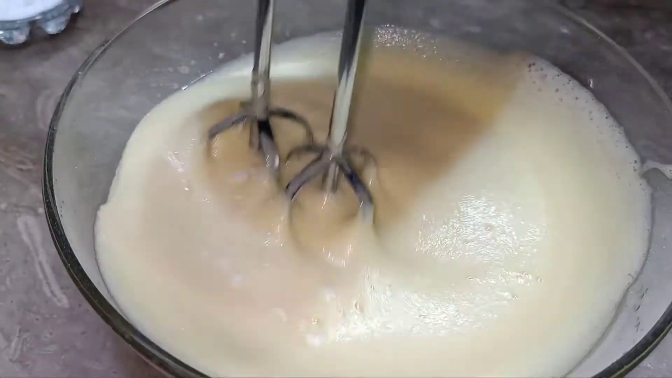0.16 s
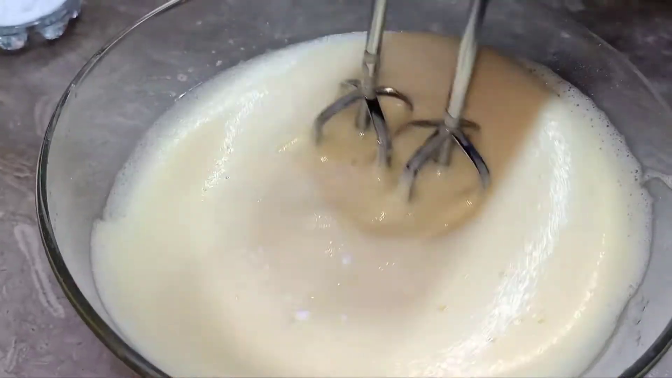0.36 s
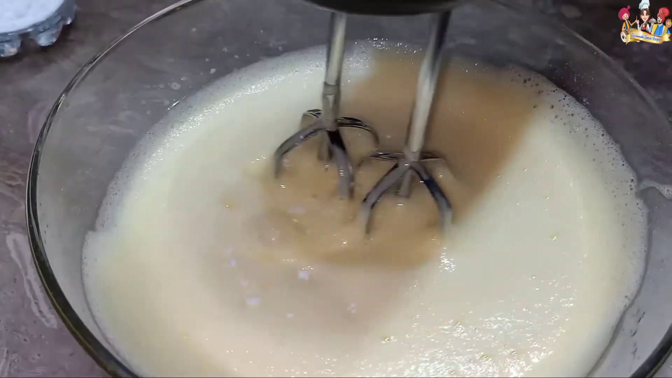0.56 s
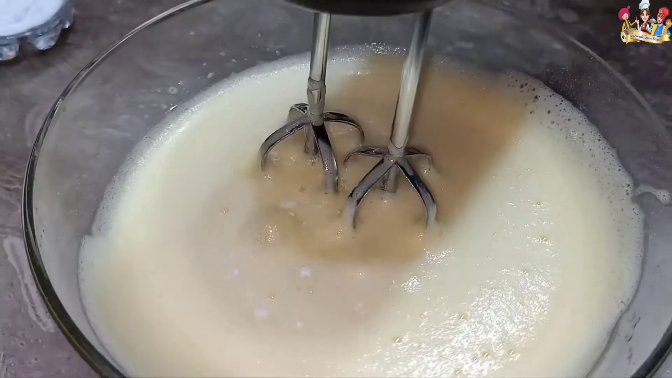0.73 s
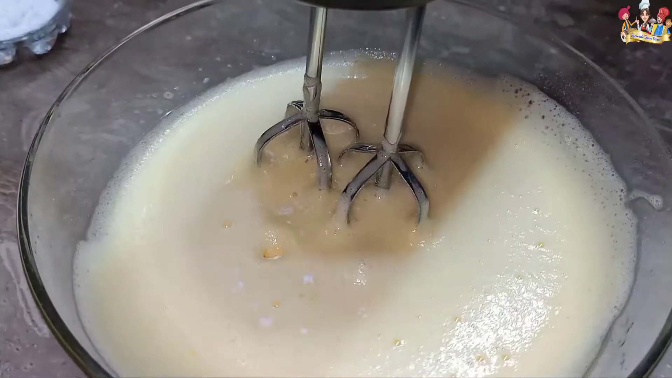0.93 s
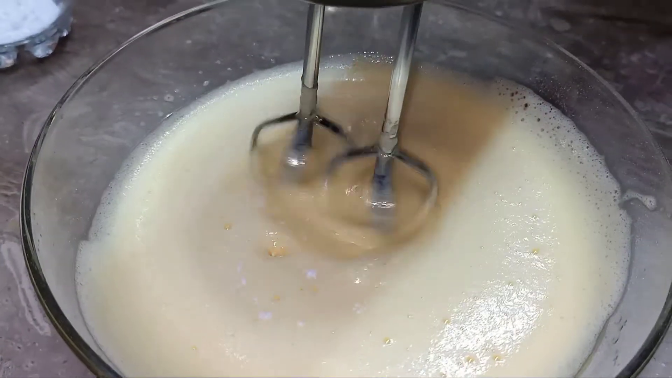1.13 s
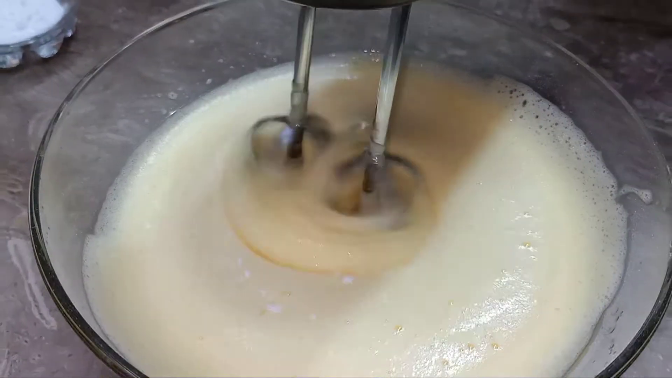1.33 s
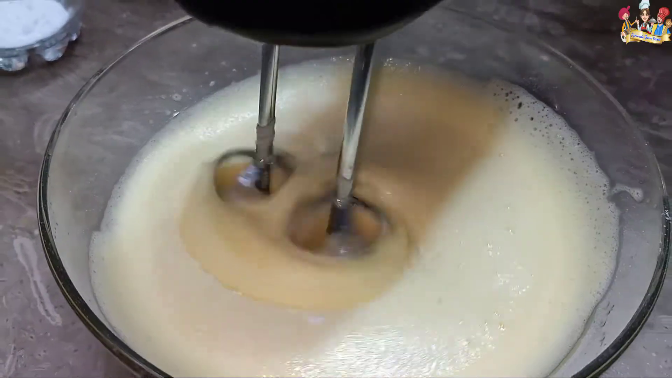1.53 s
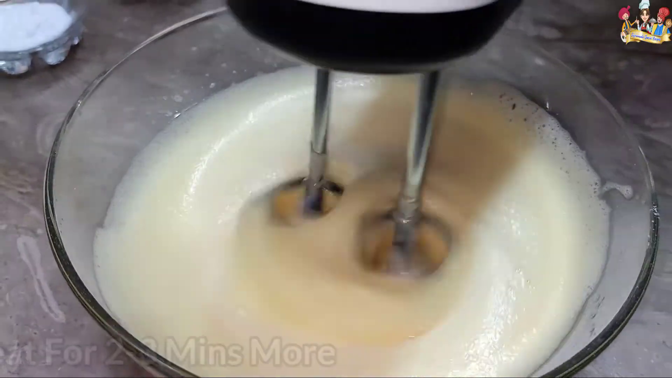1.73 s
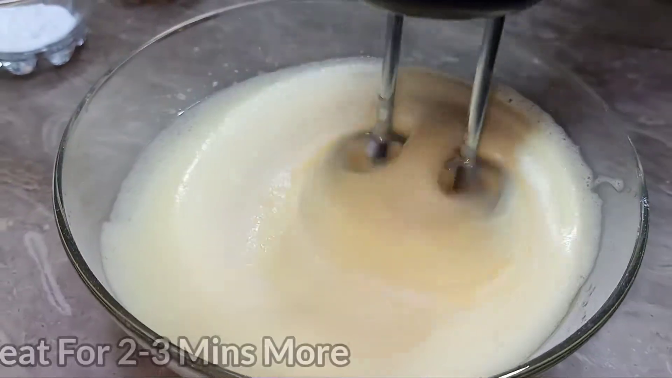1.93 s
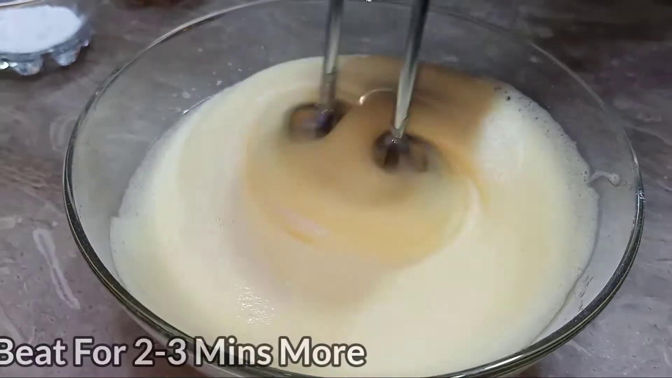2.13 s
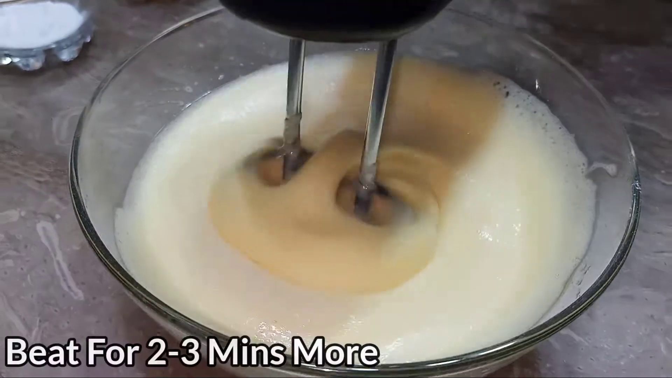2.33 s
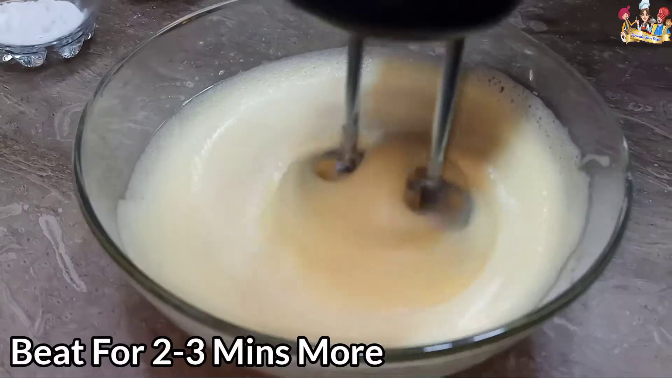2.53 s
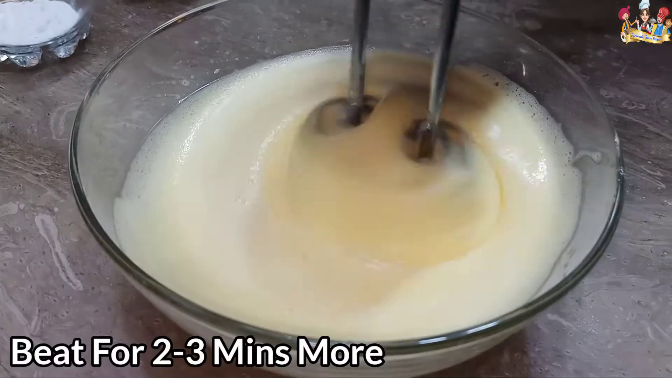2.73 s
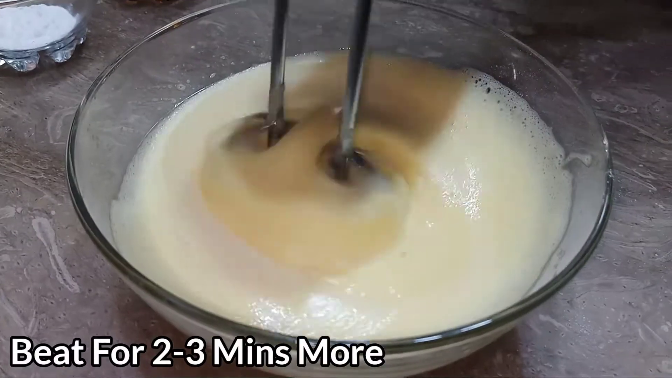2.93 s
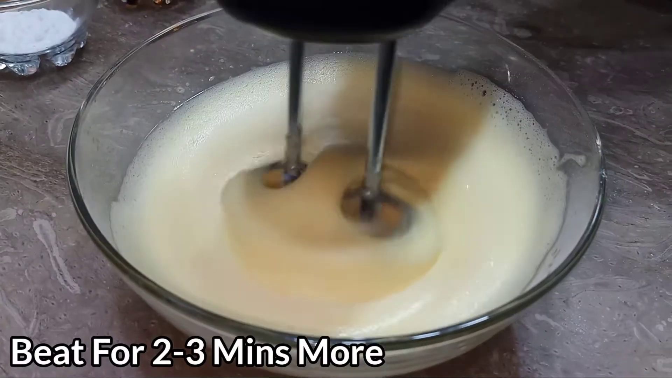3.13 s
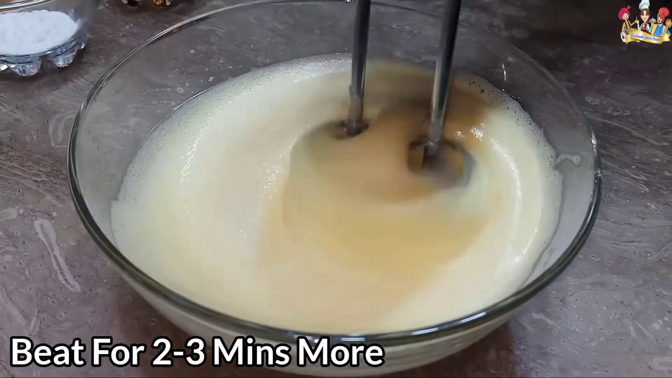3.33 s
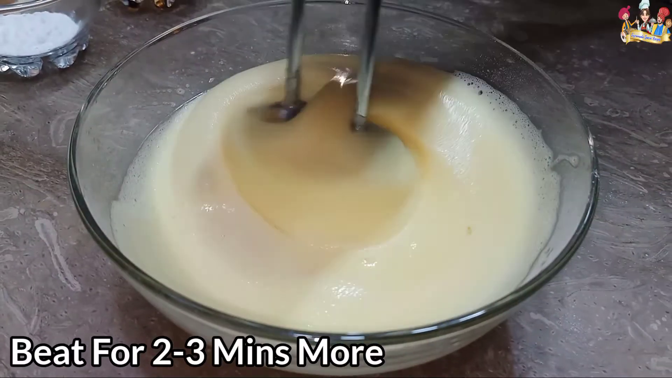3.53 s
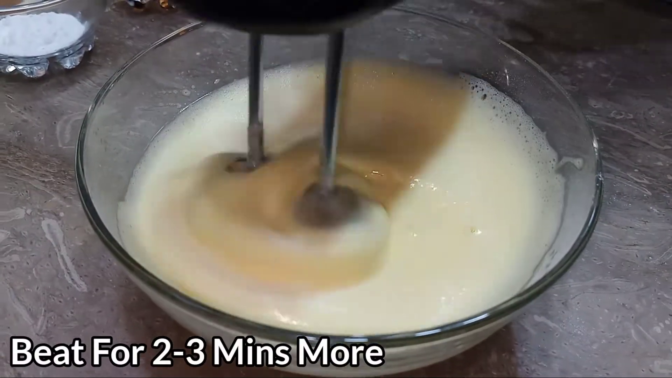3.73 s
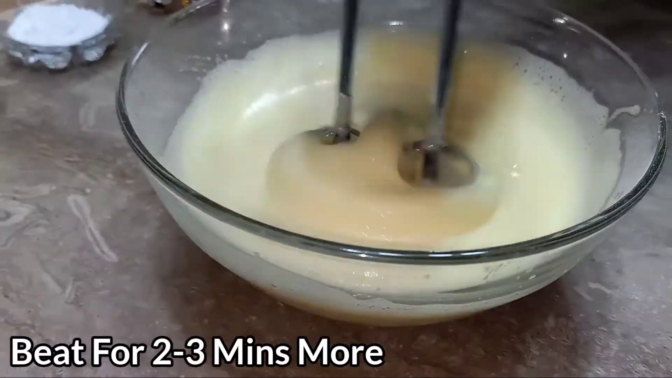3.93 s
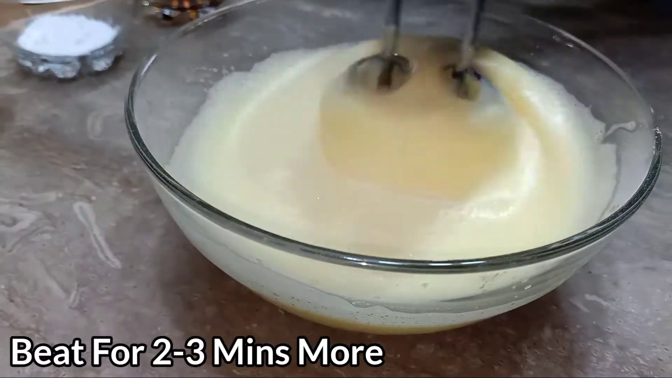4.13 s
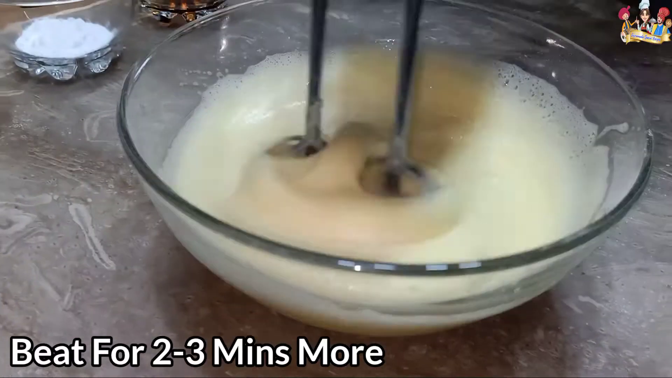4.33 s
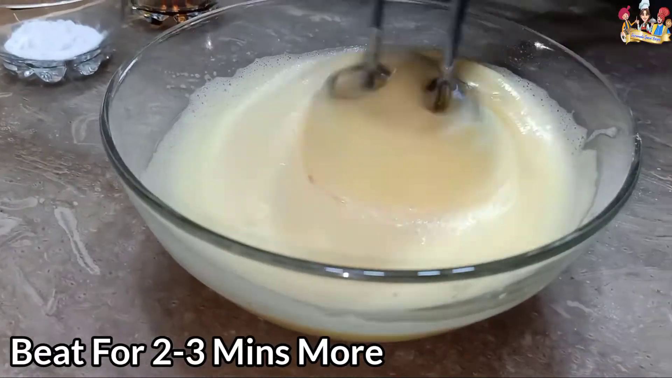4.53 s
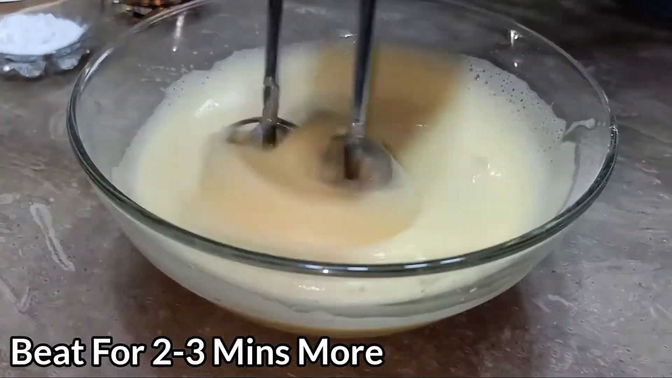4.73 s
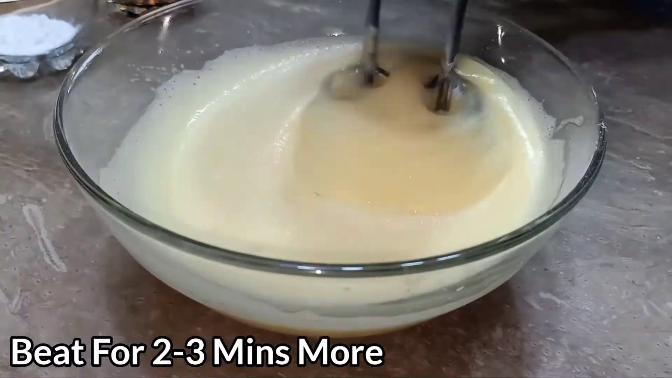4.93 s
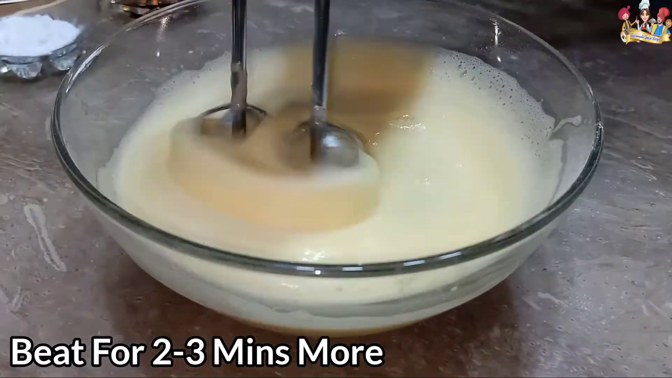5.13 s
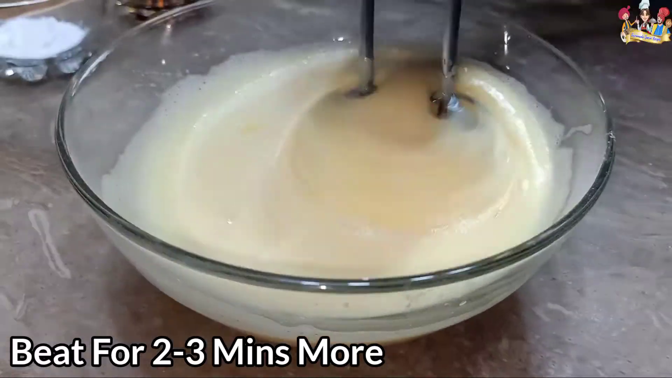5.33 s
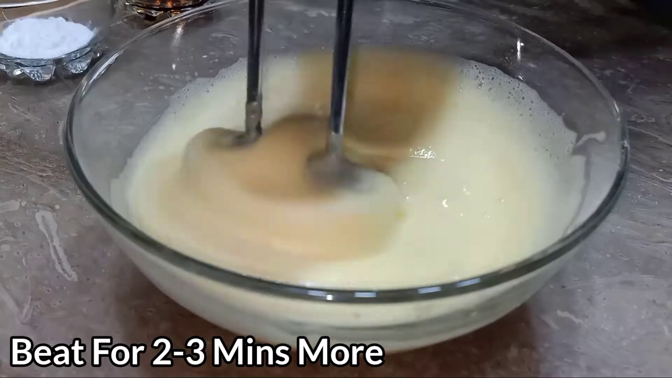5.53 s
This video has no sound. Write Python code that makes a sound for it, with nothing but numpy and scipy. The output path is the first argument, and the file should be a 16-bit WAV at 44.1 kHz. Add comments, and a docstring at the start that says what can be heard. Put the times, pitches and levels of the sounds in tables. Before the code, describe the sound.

After a second of small knocks and clicks, an electric mixer spins up, buzzes and rattles through batter, then cuts to faster, softer whirring.

```python
"""An electric hand mixer, its motor whining up to speed and rattling its housing, whips batter in a glass bowl.
Before it starts, the beaters knock on the bowl, the grip shifts and plastic clicks in a quiet small kitchen.
Taps of brushes and gears excite resonances, slots and bars give the whine, low multiples of the turn the hum.
Wires graze the glass as sines and tick as bright noise bursts; damped modes sound the knocked bowl.
Near the end the scene cuts to such mixing played half again as fast, so higher, and turned down."""
import sys
import numpy as np
from scipy import signal
from scipy.fft import rfft, irfft, next_fast_len
from scipy.io import wavfile
from scipy.ndimage import map_coordinates

SR = 44100
rng = np.random.default_rng(int(sys.argv[2]) if len(sys.argv) > 2 else 0)


def materialize(psi):
    """Save the field psi as 16-bit PCM at rate SR to the path in sys.argv[1].

    A 1-D psi becomes a single channel; in a 2-D psi each row is a channel.
    """
    bounded = np.clip(np.atleast_2d(psi).T, -1, 1)
    quanta = np.round(bounded * 32767).astype(np.int16)
    wavfile.write(sys.argv[1], SR, quanta)


N = 245637
TIME = np.arange(N) / SR
FULL_SPEED = 277   # reference speed, turns per s


def from_db(db):
    """Level as a logarithm: 20 dB is a tenfold amplitude."""
    return 10 ** (np.asarray(db) / 20)


def rms_one(x):
    """Normalization to unit effective value."""
    return x / np.sqrt(np.mean(x ** 2) + 1e-20)


def at_hz(points, hz):
    """Linear interpolation of a spectrum on a logarithmic frequency axis."""
    f, value = np.transpose(points)
    return np.interp(np.log(np.maximum(hz, 1)), np.log(f), value)


def panned(pan_db):
    """Constant-power panning: left and right gains for a given level difference."""
    gains = from_db(np.array([pan_db, -pan_db]).reshape(2, -1) / 2)
    return gains / np.sqrt(np.mean(gains ** 2, axis=0))


def drift(rate):
    """Slow random modulation: a smooth curve through random knots of spread 1, rate of them per second."""
    knots, coarse = rng.standard_normal(4000), TIME[::25]
    return np.interp(TIME, coarse, map_coordinates(knots, [coarse * rate], order=2))


def swell(s, length_s):
    """Gaussian envelope round a moment; the length is its full width at half power."""
    return np.exp(-2 * np.log(2) * np.minimum(((TIME - s) / length_s) ** 2, 20))


def band(x, low_hz, high_hz, order=2):
    """Causal Butterworth band-pass."""
    high_hz = min(high_hz, .48 * SR)
    edges = [min(low_hz, high_hz - 1), high_hz]
    sos = signal.butter(order, edges, "band", fs=SR, output="sos")
    return signal.sosfilt(sos, x + 1e-18)


def resonances(peaks, hz):
    """Resonance response: power gains of several peaks add for a tone of this pitch."""
    power = 0
    for centre, width, db in peaks:
        detuning = 2 * (hz - centre) / width
        power = power + from_db(db) ** 2 / (1 + detuning ** 4)
    return np.sqrt(power)


# interaural coherence: (f/Hz, correlation of the two ears)
LIKENESS = [(60, 0.89), (280, 0.78), (900, 0.77), (1400, 0.15), (2550, 0.22), (3200, 0.041), (6000, 0.035)]


def two_ears(mid, side, hz):
    """Interaural coherence: bass reaches both ears nearly alike, treble by nearly unrelated paths."""
    alike = np.clip(at_hz(LIKENESS, hz), -1, 1)
    common = np.sqrt(1 + alike) * mid
    opposed = np.sqrt(1 - alike) * side * [[1], [-1]]
    return (common + opposed) / np.sqrt(2)


def noise(spectrum, pan, playback=1):
    """Spectral shaping: stereo random noise is given a set level per Hz, shifted up by the playback speed."""
    size = next_fast_len(N)
    hz = np.arange(size // 2 + 1) * SR / size / playback
    ears = two_ears(*rfft(rng.standard_normal((2, size))), hz)
    shaped = ears * from_db(at_hz(spectrum, hz)) * panned(at_hz(pan, hz))
    return irfft(shaped, size)[:, :N] * np.sqrt(SR / 2 / playback)


def tone(turns, flutter_db, flutter_rate=14, wander=0.58):
    """Random amplitude and phase modulation of a sine, independent at each ear; rms 1 without flutter."""
    ears = []
    for _ in range(2):
        phase = 2 * np.pi * turns + wander * drift(flutter_rate)
        ears.append(np.sqrt(2) * np.sin(phase) * from_db(flutter_db * drift(flutter_rate)))
    return np.array(ears)


def contact(s, decay_s, grit):
    """Impact excitation: a unit impulse with a short exponentially decaying noise tail, unlike at each ear."""
    age = TIME[:N // 50]
    tail = rng.standard_normal((2, len(age))) * np.exp(-age / decay_s)
    burst = grit * tail / np.sqrt(decay_s * SR / 2)
    burst[:, 0] += 1
    out = np.zeros((2, N))
    start = round(s * SR)
    out[:, start:start + len(age)] = burst
    return out


# quiet kitchen, spectral density: (f/Hz, level/dB per Hz)
KITCHEN_SPECTRUM = [(25, -99), (60, -96), (130, -87.5), (190, -92), (400, -93), (800, -98), (1600, -104),
                    (2300, -103), (3800, -111), (5600, -107), (7000, -113), (8000, -128), (15000, -129)]


def kitchen_hush():
    """Stationary background noise with most of its power in the bass."""
    return noise(KITCHEN_SPECTRUM, [(100, -0.69), (8000, 1)])   # pan: f/Hz, left re right/dB


ROOM_T60_S, TAIL_DB = 0.18, -11   # reverberation time; tail re direct sound


def room(x, wall_cut_hz=7000):
    """Diffuse reverberation: the direct sound plus an exponentially decaying tail, dulled by the walls."""
    age = TIME[:SR // 2]
    tail = band(rng.standard_normal((2, len(age))), 526, wall_cut_hz, order=4)
    tail *= from_db(-60 * age / ROOM_T60_S) * (age > .004)
    tail /= np.sqrt(np.sum(tail ** 2, axis=1, keepdims=True))
    return x + from_db(TAIL_DB) * signal.fftconvolve(x, tail, axes=1)[:, :N]


NOTE_START_S, NOTE_LENGTH_S = .294, 0.34
NOTE_HZ, NOTE_RISE_HZ_PER_S = 720, 420
NOTE_PING_DB, NOTE_PING_S, NOTE_HOLD_DB = -50.5, 0.024, -70.5   # ping level, its decay, lingering level


def faint_note(release_s=.05):
    """Frequency glide: a thin note pings with a knock, then lingers faintly, wavering as it rises."""
    age = np.maximum(TIME - NOTE_START_S, 0)
    gate = (age > 0) * np.clip((NOTE_LENGTH_S - age) / release_s + .5, 0, 1)
    level = from_db(NOTE_PING_DB) * np.exp(-age / NOTE_PING_S) + from_db(NOTE_HOLD_DB)
    turns = np.cumsum(NOTE_HZ + NOTE_RISE_HZ_PER_S * age) / SR
    return gate * level * tone(turns, 3.5, 55, .9)


# resonances of housing, beaters and bowl: (f/Hz, width/Hz, level/dB, left re right/dB)
BODY = [(197.6, 21.4, -17.5, 2), (249.5, 60, -17.5, 4), (576.6, 54, -11, 3.5), (650, 90, -8.5, -3.5),
        (761, 99, -12, -1.5), (892, 32, -9.5, 4), (974, 62, -13, 0.5), (1075, 77, -14, 1),
        (1358, 188, -11, -5), (1755, 153, -13, 3.5), (1930, 49, -11, -14), (2053, 126, -1.07, -4),
        (2574, 426, -8, 1), (3510, 520, -23.5, -18), (4053, 98, -16.5, -0.5), (4874, 300, -14, -5),
        (5157, 133, -5, 6.5), (5335, 230, -7, 1), (5590, 93, -10, 0), (5960, 280, -8.5, 9.5),
        (6580, 420, -13.5, 5.5), (6990, 140, -19, 14), (7800, 2540, -26, 2), (12000, 630, -26, 24),
        (13500, 750, -24.5, 28)]


def housing(x):
    """Forced vibration: the body's resonances ring along with whatever touches it."""
    return sum(from_db(db) * band(x, hz - width / 2, hz + width / 2, order=1) for hz, width, db, _ in BODY)


# the grip shifts on the handle; the last two rows are short low hums of the body during the run-up:
# (t/s, length/s, rustle level/dB, dull hum level/dB)
GRIPS = [(0.183, 0.017, -56, -56), (0.411, 0.046, -61, -55), (0.504, 0.051, -65, -83),
         (0.73, 0.11, -86, -60), (0.856, 0.066, -84, -67), (0.99, 0.043, -83, -62),
         (1.201, 0.049, -51, -57), (1.261, 0.014, -70, -50), (1.563, 0.082, -71, -53)]


def handling(direct_db=-3):
    """Friction noise and resonance: fingers rub the plastic, and the hollow body hums in a narrow band."""
    friction = rng.standard_normal((2, N)) * from_db(5.8 * drift(110))
    through_body = housing(band(friction, 500, 4900, order=6))
    rub = rms_one(through_body + from_db(direct_db) * band(friction, 580, 2900))
    hum = rms_one(band(rng.standard_normal(N), 188.6, 199.0))
    out = 0
    for s, length_s, rustle_db, hum_db in GRIPS:
        out = out + swell(s, length_s) * (from_db(rustle_db) * rub + from_db(hum_db) * hum)
    return out


# clicks of switch, grip and beater sockets:
# (t/s, relative level/dB, lowest f/Hz, highest f/Hz, decay time constant/s)
CLICKS = [(0.661, -19, 3000, 15000, .004), (0.696, -3, 1270, 14200, 0.0032),
          (0.749, -7, 1190, 14000, 0.0042), (0.765, -10.5, 597, 4000, 0.0062),
          (.796, -11.5, 2170, 14100, 0.0057), (.959, -10, 250, 1730, 0.0038),
          (.973, -3.5, 200, 3270, 0.006), (0.984, -5, 200, 3370, 0.0065), (1.001, -5, 200, 3220, 0.006),
          (1.1, -8.5, 1770, 15000, 0.0045), (1.153, -14.5, 2030, 14000, .004)]


def clicks(direct_db=-5, crack_db=-14.5, level_db=-15, crack_low_hz=10500):
    """Impulse response: plastic snaps are heard directly, crack brightly and set the housing ringing."""
    snaps = 0
    for s, db, low, high, decay_s in CLICKS:
        snaps = snaps + from_db(db) * band(contact(s, decay_s, grit=1.66), low, high, order=5)
    body = band(housing(snaps) + from_db(direct_db) * snaps, 60, 5200, order=5)
    crack = from_db(crack_db) * band(snaps, crack_low_hz, 20000, order=1)
    return from_db(level_db) * (body + crack)


# rough narrow rings, first from the touched beaters, later as the motor runs up:
# (t/s, length/s, f/Hz, level/dB)
NARROW_RINGS = [(0.31, 0.015, 5750, -69), (0.395, 0.024, 5360, -69), (1.56, .014, 5270, -39.5),
                (1.683, 0.16, 5270, -45.5), (1.79, 0.18, 2018, -41), (1.87, 0.046, 5150, -45.5),
                (2.333, 0.033, 2085, -39)]


def narrow_rings(rough_db=7.0, wander=1.94):
    """Narrow-band resonance: each row sets one narrow resonance ringing roughly."""
    out = 0
    for s, length_s, hz, db in NARROW_RINGS:
        out = out + from_db(db) * swell(s, length_s) * tone(hz * TIME, rough_db, 220, wander)
    return out


# idle beaters against the bowl: (t/s, blow level/dB, relative clink level/dB, hardness cutoff f/Hz)
KNOCKS = [(.0975, -32.5, -20.5, 1300), (.1795, -51, -6, 3000), (.1825, -39.5, -14.5, 4500),
          (.294, -39.5, -7.5, 1100), (.449, -66, 6, 3000)]
# modes of the bowl full of batter: (f/Hz, relative level/dB, reverberation time t60/s)
BOWL = [(186, -11, 0.13), (296, -15, 0.29), (572, 1, 0.06), (640, -1.5, 0.049), (717, -2, 0.052),
        (790, -7, .04), (872, -2.5, 0.09), (1070, 2, 0.013), (1420, -8, 0.027), (2120, -6.5, 0.028),
        (3970, -16, 0.022)]
CLINK_HZ, CLINK_WIDTH_HZ = 5470, 2700


def knocks(spread_db=2.0, tick_db=-19):
    """Modal excitation: each blow, on another spot, drives the damped modes anew, and the wires clink."""
    blows, clinks = np.zeros((len(KNOCKS), N)), np.zeros((2, N))
    for blow, (s, db, clink_db, hard_hz) in zip(blows, KNOCKS):
        blow[round(s * SR)] = from_db(db)
        blow[:] = band(blow, 40, hard_hz, order=1)
        clinks += from_db(db + clink_db + 21.5) * contact(s, decay_s=0.0071, grit=1.4)
    out = band(clinks, CLINK_HZ - CLINK_WIDTH_HZ / 2, CLINK_HZ + CLINK_WIDTH_HZ / 2, order=3)
    out += from_db(tick_db) * band(clinks, 9500, 15000)   # steel on glass adds a fine tick
    for k, (hz, db, t60) in enumerate(BOWL):
        radius, angle = from_db(-60 / (t60 * SR)), 2 * np.pi * hz / SR   # pole of a decaying sine
        spot_db = spread_db * rng.standard_normal(len(KNOCKS))
        drive = ((-1) ** k * from_db(db - 7.5 + spot_db)) @ blows
        out += signal.lfilter([0, np.sin(angle)], [1, -2 * radius * np.cos(angle), radius ** 2], drive)
    return out


# a beater grazes the glass: (t/s, length/s, level/dB)
GRAZES = [(1.756, 0.057, -43.5), (2.3, 0.027, -61), (2.682, 0.023, -39.5), (2.9, 0.018, -37),
          (3.06, 0.025, -37), (3.106, 0.011, -51), (3.17, 0.016, -36), (3.324, 0.028, -48),
          (3.489, 0.016, -47), (3.779, 0.034, -37), (4.32, 0.032, -43), (4.424, 0.011, -34.5),
          (4.658, 0.017, -37), (4.75, 0.0098, -38), (4.801, 0.01, -28.5), (5.179, 0.031, -38.5),
          (5.254, 0.0085, -30.5), (5.52, 0.017, -41.5)]
GLASS_HZ, GLASS_PAN_DB = 1380, -9.5   # pitch at normal playback; left re right


def grazes(playback, rough_db=2.5, wander=1.13):
    """Sustained excitation: wires brushing the bowl keep one mode of the glass ringing unsteadily."""
    pressure = sum(from_db(db) * swell(s, length_s) for s, length_s, db in GRAZES)
    singing = tone(GLASS_HZ * playback * TIME, rough_db, 120 * playback, wander)
    return pressure * panned(GLASS_PAN_DB) * singing


# the spinning beater wires tick against the glass: (t/s, level before the band-pass/dB)
TICKS = [(1.397, -6), (1.425, -5), (1.436, -4.5), (1.455, -6), (2.344, -20), (2.4, -8), (2.48, -8),
         (2.822, -7), (4.634, -11), (4.688, -9), (4.873, -6), (4.893, -10), (4.953, -6.5)]
TICK_LOW_HZ, TICK_HIGH_HZ, TICK_DECAY_S = 4900, 6400, 0.009   # band at normal playback


def ticks(playback):
    """Band-limited impacts: short bright ticks of steel wire that stand out of the rattle."""
    hits = sum(from_db(db) * contact(s, TICK_DECAY_S, grit=3.1) for s, db in TICKS)
    return band(hits, TICK_LOW_HZ * playback, TICK_HIGH_HZ * playback, order=4)


# cooling air, spectral density before the speed scaling: (f/Hz, level/dB per Hz)
AIR = [(25, -105), (60, -90.5), (110, -86.5), (200, -80), (450, -80.5), (1000, -81), (2000, -74.5),
       (3000, -75.5), (4400, -79), (6500, -78), (7600, -90.5), (10500, -92), (15000, -91)]
# direction of the air: (f/Hz, left re right/dB)
AIR_PAN = [(100, -2.5), (400, 1.5), (1300, -12.5), (3500, 11), (14000, 2)]


def cooling_air(effort, playback):
    """Flow noise: broadband sound that grows with speed."""
    return noise(AIR, AIR_PAN, playback) * np.sqrt(effort)


GRIND_DB, GRIND_ATTACK_S, GRIND_DECAY_S = -36.5, 0.032, 0.05


def grind(age):
    """Transient band noise: the gears take up the load with a short rasp."""
    attack = np.minimum(age / GRIND_ATTACK_S, 1) ** 2
    decay = np.exp(-np.maximum(age - GRIND_ATTACK_S, 0) / GRIND_DECAY_S)
    rasp = rms_one(band(rng.standard_normal((2, N)), 690, 1160))
    return from_db(GRIND_DB) * attack * decay * rasp


# rotor tones, from imbalance, cooling fan and gears:
# (multiple of the turn, level/dB, phase wander/rad, left re right/dB, level flutter/dB)
ROTOR_TONES = [(1, -49, 0.27, 8, 1.5), (2, -63, 0.62, -3.5, 6), (3, -60, 0.4, 2, 3.5),
               (4, -62, .34, 10, 1.5), (5, -66, 0.69, -9, -1), (8, -59.5, 0.83, 4, 4.5),
               (9, -52.5, 0.71, -4.5, 2)]
# resonances that lift each tone as it passes through them: (f/Hz, width/Hz, lift/dB)
ROTOR_PEAKS = [(403, 70, 7), (727, 78, 10), (1060, 50, 12.5), (1320, 50, 10), (2035, 120, 17),
               (2170, 180, 8.5), (2520, 100, 9)]
HUM_FULL_AT = 0.75   # share of full speed at which the rotor tones are all there


def rotor(turns, speed, lowest_hz=175, flutter_rate=32):
    """Harmonic excitation: multiples of the turn climb through resonances; a small housing radiates no bass."""
    tones = 0
    for multiple, db, wander, pan_db, flutter_db in ROTOR_TONES:
        lift = np.hypot(1, resonances(ROTOR_PEAKS, multiple * speed))
        line = tone(multiple * turns, flutter_db, flutter_rate, wander)
        tones = tones + from_db(db) * lift * panned(pan_db) * line
    growth = np.minimum(speed / FULL_SPEED / HUM_FULL_AT, 1) ** 5.4
    return band(tones * growth, lowest_hz, 9800, order=4)


# how the rattle follows the circling, from churning batter up to the brushes:
# (f/Hz, swing/dB, creep/dB per s)
STIRRING = [(780, 1.1, 0.47), (1330, 2.5, 0), (2020, -0.5, 0.5), (5200, 0.5, 1.4)]
# interaural phase, by which the rattle reaches the left ear later: (f/Hz, lag/rad)
EAR_LAG = [(200, -0.55), (620, 0.9), (950, -0.86), (1365, 0.74), (1800, 3), (2050, 2), (2260, 1),
           (2550, 0.54), (4700, 2)]
RATTLE_DB, FLICKER_DB = -15.5, 1.9   # gain at full speed; random flicker at normal playback


def rattle(body, turns, stir, since, playback, flicker_db, blade_depth=0.1, uneven_db=0.5):
    """Repeated impacts: brushes and gear teeth tap the body 24 times a turn, harder as a beater blade bites."""
    at = np.flatnonzero(np.diff(np.floor(24 * turns)))   # samples of the taps
    bite = 1 + blade_depth * np.cos(np.pi / 2 * turns[at])   # one bite every four turns
    lumps_db = uneven_db * drift(13)[at]
    stirring = np.array(STIRRING)
    out = np.zeros((2, N))
    for hz, width, db, pan_db in body:
        swing_db = at_hz(stirring[:, :2], hz) * stir[at]
        creep_db = at_hz(stirring[:, ::2], hz) * since[at]
        load_db = swing_db + creep_db + lumps_db
        strength = bite * from_db(db + load_db + flicker_db * drift(45)[at])
        taps = np.zeros((2, N))
        taps[:, at] = strength * two_ears(*rng.standard_normal((2, len(at))), hz)
        lag = round(at_hz(EAR_LAG, hz) * SR / (2 * np.pi * hz * playback))
        taps[0] = np.roll(taps[0], lag)
        ringing = band(taps, (hz - width / 2) * playback, (hz + width / 2) * playback)
        out += panned(pan_db) * ringing
    return from_db(RATTLE_DB) * out * np.sqrt(SR / (24 * FULL_SPEED)) / playback


# twelve armature slots and 24 commutator bars: (multiple of the turn, level/dB, left re right/dB, phase wander/rad)
WHINE_ORDERS = [(12, -1, -1, 0.88), (24, -9.5, 9, 0.39), (36, -20.5, 1, 1.5), (48, -23.5, 2, 3)]
# resonances that the whine sweeps through as the motor speeds up: (f/Hz, width/Hz, level/dB)
WHINE_PEAKS = [(916, 320, -27), (1315, 160, -29), (1690, 340, -60), (2050, 140, -40.5), (2525, 170, -29.5),
               (2820, 217, -43), (3220, 620, -55.5), (4270, 720, -54), (5320, 360, -24.5), (6000, 660, -34),
               (6522, 270, -32), (9650, 3300, -37)]
FLUTTER_DB, WHINE_SWING_DB = 2.0, 3.5   # random flutter; swing round a circle
START_SHUDDER = 3.4   # rad at 24 times the turn, per root of the relative starting current


def whine(turns, speed, current, sway, full_at=0.24):
    """Swept resonance: slot and bar tones climb through peaks; the heavy starting current roughens their phase."""
    shudder = START_SHUDDER * np.sqrt(np.minimum(current, .12)) * drift(260) / (48 * np.pi)   # in turns
    out = 0
    for multiple, db, pan_db, wander in WHINE_ORDERS:
        line = tone(multiple * (turns + shudder), FLUTTER_DB, 40, wander)
        gain = from_db(db) * resonances(WHINE_PEAKS, multiple * speed)
        out = out + gain * panned(pan_db) * line
    rise = np.minimum((1 - current) / full_at, 1) ** 2
    return out * rise * from_db(WHINE_SWING_DB * sway)


# brief excess over the cruising speed: (t/s, length/s, extra turns per s)
OVERSHOOT = (2.08, .3, 3)
SWITCH_ON_S, SPIN_UP_S = 1.157, .202   # start; time constant of the run-up
CIRCLING_ONSET_S = 0.96   # the circles widen over this time after the switch
RISE_POWER, MAINS_HZ = 1.01, 50   # power of speed that rattle and air grow with; mains frequency


def mixer(body, circling, cruise, playback, whine_db=0, flicker_db=FLICKER_DB):
    """Exponential run-up: sound grows with speed, sways with the circling and throbs at twice the mains."""
    (loudest_s, circle_s), (cruising, creep, swing) = circling, cruise
    age, since = np.maximum(TIME - SWITCH_ON_S, 0), TIME - loudest_s
    stir = np.cos(2 * np.pi * since / circle_s)
    sway = stir * np.minimum(age / CIRCLING_ONSET_S, 1) ** 2
    current = np.exp(-age / SPIN_UP_S)   # relative starting current
    over_s, over_length_s, over_speed = OVERSHOOT
    speed = (cruising + creep * since + swing * stir) * (1 - current)
    speed = speed + over_speed * swell(over_s, over_length_s)
    turns, effort = np.cumsum(speed) * playback / SR, speed / FULL_SPEED
    rush = rattle(body, turns, sway, since, playback, flicker_db) + cooling_air(effort, playback)
    throb_depth = .55 * np.sqrt(np.minimum(current / .12, 1))
    throb = 1 + throb_depth * np.cos(4 * np.pi * MAINS_HZ * age)
    singing = throb * (from_db(whine_db) * whine(turns, speed, current, sway) + grind(age))
    wires = grazes(playback) + ticks(playback)
    return (age > 0) * (effort ** RISE_POWER * rush + rotor(turns, speed) + singing + wires)


# the beaters are led round the bowl in circles: (t/s at the loudest point, period/s)
CIRCLING = (3.13, .71)
FAST_CIRCLING = (4.81, .44)
# cruising speed before playback: (turns per s, creep/turns per s per s, swing round a circle/turns per s)
CRUISE = (276.7, -2.9, .7)
FAST_CRUISE = (277.7, 1.8, 1.3)
# two narrow rings of the normal part only: (f/Hz, width/Hz, level/dB, left re right/dB)
PASSING_RING = [(2022, 63, -6.5, -4), (2280, 89, -4, 4.7)]
CUT_IN_S, CUT_OUT_S = 4.03, 4.078   # midpoints of the fast part's fade-in and the normal part's fade-out
FAST_PLAYBACK, FAST_DB, FAST_WHINE_DB, FAST_FLICKER_DB = 1.5, -6.5, -15, 2.4


def scene(lift_db=-7, lift_hz=7500):
    """Superposition: handling, start and steady mixing, briefly overlapped by sped-up mixing with a treble lift."""
    fade_out = np.clip((CUT_OUT_S - TIME) / 0.0091 + .5, 0, 1)
    fade_in = np.clip((TIME - CUT_IN_S) / 0.01 + .5, 0, 1)
    before_start = knocks() + clicks() + faint_note()
    hums_and_rings = handling() + narrow_rings()
    running = mixer(BODY + PASSING_RING, CIRCLING, CRUISE, 1)
    normal = room(before_start + hums_and_rings + running) + kitchen_hush()
    fast = room(mixer(BODY, FAST_CIRCLING, FAST_CRUISE, FAST_PLAYBACK, FAST_WHINE_DB, FAST_FLICKER_DB))
    fast = fast + from_db(lift_db) * band(fast, lift_hz, 16400, order=1)
    return fade_out * normal + fade_in * from_db(FAST_DB) * fast


CUTOFF_HZ = 15650


def record(dry):
    """Elliptic low-pass filtering: the top is cut steeply."""
    return signal.sosfilt(signal.ellip(10, .1, 80, CUTOFF_HZ, fs=SR, output="sos"), dry)


dry = scene()
out = record(dry)
materialize(out)
```